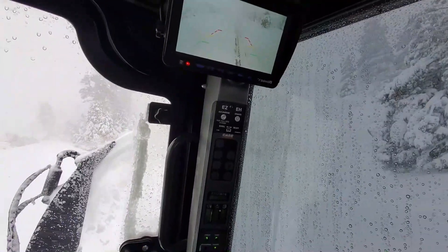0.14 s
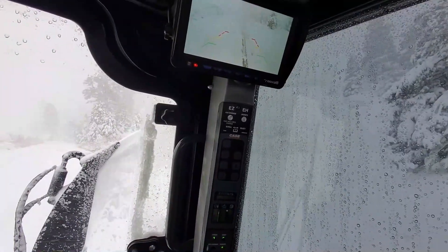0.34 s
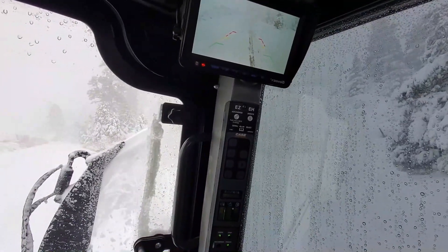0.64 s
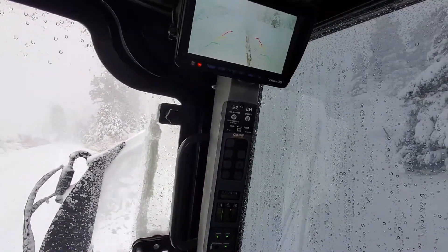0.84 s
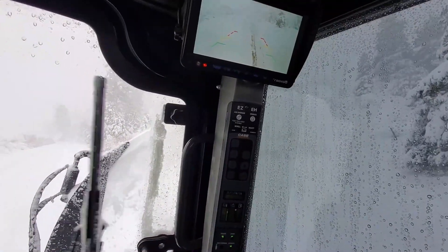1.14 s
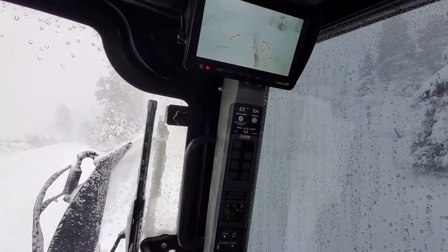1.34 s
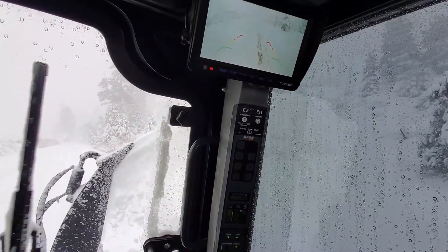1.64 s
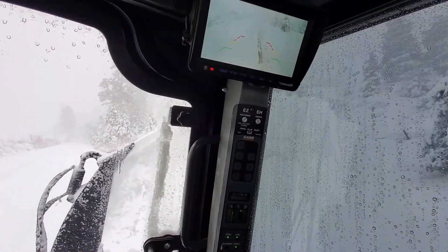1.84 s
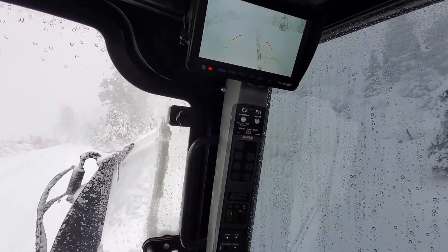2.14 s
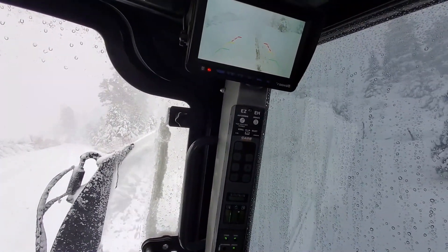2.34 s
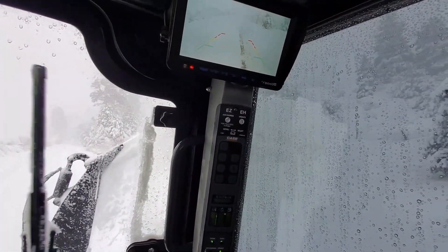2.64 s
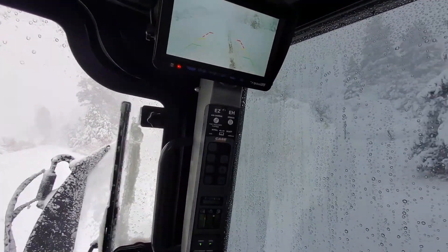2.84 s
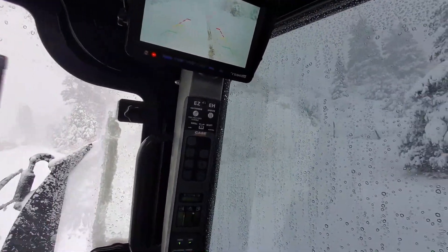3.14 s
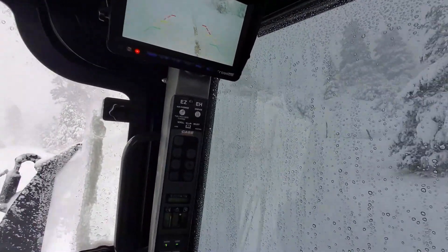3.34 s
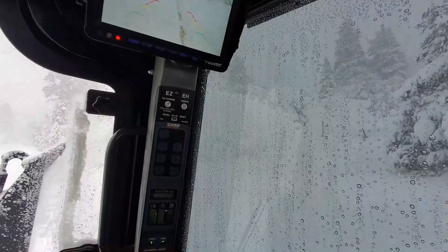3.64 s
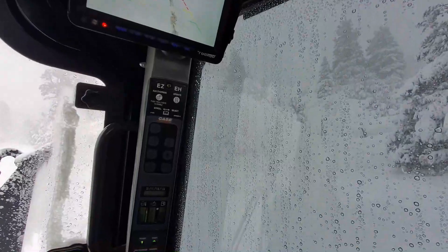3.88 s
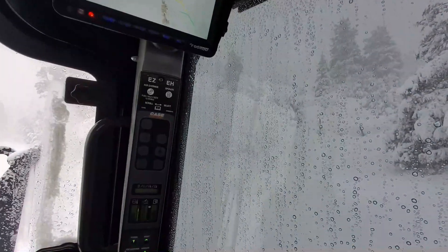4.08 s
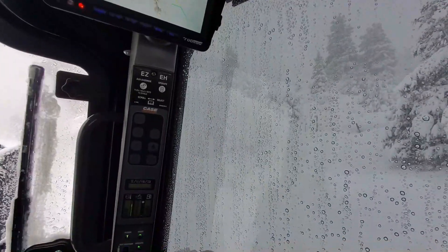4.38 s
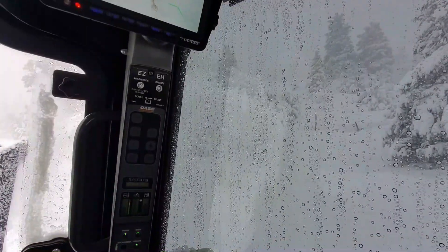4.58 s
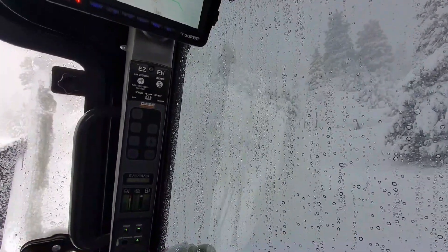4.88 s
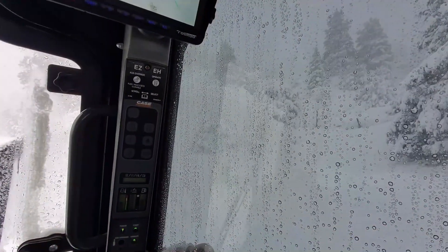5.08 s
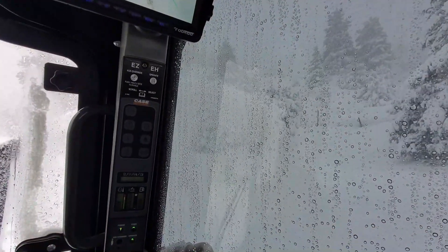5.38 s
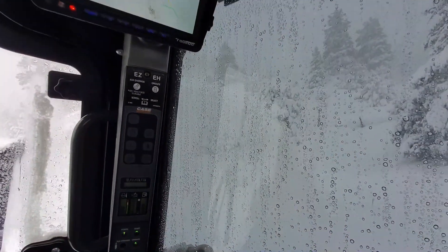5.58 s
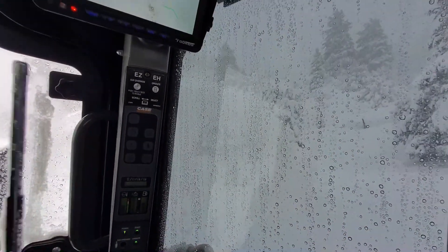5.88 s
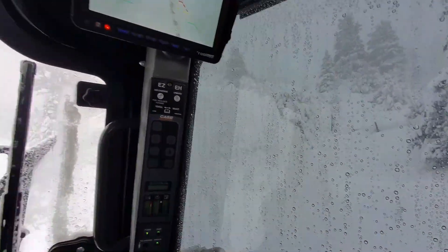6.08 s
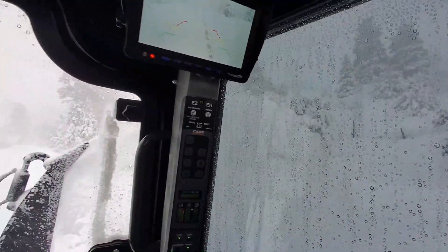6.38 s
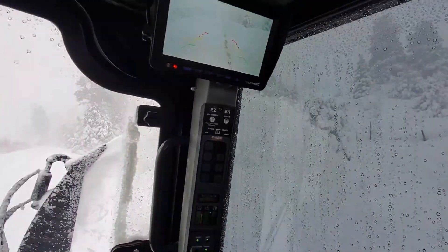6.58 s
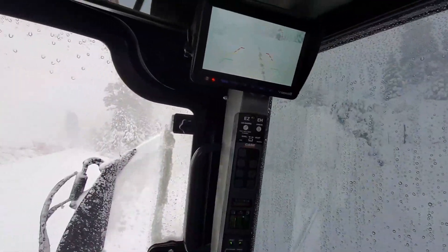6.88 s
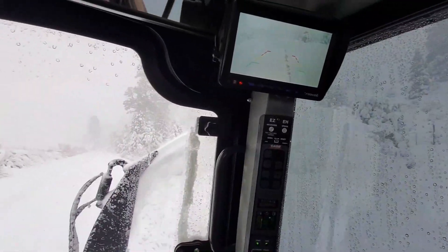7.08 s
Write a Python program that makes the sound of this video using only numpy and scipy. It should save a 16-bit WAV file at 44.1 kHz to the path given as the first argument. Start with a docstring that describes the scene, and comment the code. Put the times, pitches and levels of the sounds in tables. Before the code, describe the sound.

A continuous, dense mechanical drone fills a machine cab: low engine throb, firm hydraulic humming, fluttering high whine, snow rush and airy hiss. Revs sag very slightly at the start, then stay even, creeping up near the end. Individual tones drift in strength as the handheld microphone moves. A very brief dip in level occurs after five and a half seconds, followed by faint handling clicks. The left channel sounds muffled and bass-heavy, the right clearer.

```python
"""Loader cab with a snow blower at work

Inside the closed cab of a diesel loader, at steady high revs, every machine turns in step with the crankshaft.
The six-cylinder engine drones in shaft harmonics and knocks; a nine-piston pump whines by pressure ripple.
The blower's oil motor hums, its impeller thumps; low noise swells unevenly over a steady middle rush of snow.
A hand-held camera drifts through standing waves, so the tones swell and fade; its left microphone is muffled.
Air and oil hiss, the treble flickers, and the hand on the camera adds faint scuffs and ticks."""
import sys
import numpy as np
from scipy.fft import rfft, irfft, next_fast_len
from scipy.io import wavfile
from scipy.ndimage import map_coordinates

SR = 44100
rng = np.random.default_rng(int(sys.argv[2]) if len(sys.argv) > 2 else 0)


def to_wav(sig):
    """Store sig (one row per channel, or 1-D mono) as 16-bit WAV at the path in sys.argv[1].

    Samples outside -1..1 are clipped; the rate is SR.
    """
    pcm = np.clip(np.atleast_2d(sig), -1, 1) * 32767
    pcm = np.round(pcm).astype(np.int16)
    wavfile.write(sys.argv[1], SR, pcm.T)  # frames by channels


N = 318402  # samples
PISTONS = 9  # in the pump and in the blower's oil motor


def amp(db):
    """Decibel law: level in dB to amplitude gain."""
    return 10 ** (np.asarray(db) / 20)


def unit(x):
    """Power normalization: x at rms 1."""
    return x / np.sqrt(np.mean(x ** 2) + 1e-20)


def along(points, hz):
    """Logarithmic frequency scale: interpolate (frequency [Hz], value) points along it."""
    f, v = np.transpose(points)
    return np.interp(np.log(hz + 1), np.log(f + 1), v)


def curves(rows):
    """Linear interpolation in time: one value per sample for each column after the time."""
    s, *columns = np.transpose(rows)
    return [np.interp(np.arange(N) / SR, s, column) for column in columns]


def wobble(rate):
    """Band-limited random modulation: a smooth curve through normal knots, rate of them a second."""
    coarse = np.arange(0, N + 64, 64)
    knots = rng.standard_normal(2048)
    smooth = map_coordinates(knots, [coarse * rate / SR], mode="wrap")
    return np.interp(np.arange(N), coarse, smooth)


def filtered(x, response):
    """Linear filtering: the spectrum of x times a complex response of frequency."""
    size = next_fast_len(N + SR // 4, True)
    hz = np.fft.rfftfreq(size, 1 / SR)
    return irfft(rfft(x, size) * response(hz), size)[..., :N]


def coloured(white, spectrum):
    """Spectral density: white noise of rms 1 brought to a spectrum in dB per Hz."""
    return filtered(white, lambda hz: amp(along(spectrum, hz)) * np.sqrt(SR / 2))


# likeness of noise at the two ears: (frequency [Hz], correlation [-1..1])
EAR_LIKENESS = [(30, .93), (100, .88), (150, .55), (240, .44), (310, .82), (400, .85), (500, .23),
                (700, .17), (1200, .1), (2500, .05)]


def rush(spectrum):
    """Interaural coherence: stereo noise, most alike in the deep bass and nearly unrelated in the treble."""
    def mid_side_gain(hz):
        angle = np.arccos(np.clip(along(EAR_LIKENESS, hz), -1, 1)) / 2
        return amp(along(spectrum, hz)) * np.sqrt(SR / 2) * [np.cos(angle), np.sin(angle)]

    mid, side = filtered(rng.standard_normal((2, N)), mid_side_gain)
    return np.array([mid + side, mid - side])


# the camera's path in the cab: (time [s], sideways [-1..1], forward [-1..1], height [-1..1])
CAMERA_PATH = [(0.2, 0.21, 0.89, -0.22), (0.55, -0.38, 0.97, 0.12), (1.1, -0.11, 0.84, 0.16),
               (1.6, -0.43, 0.01, 0.42), (2.0, -0.32, -0.69, 0.068), (2.5, -0.55, -0.58, 0.71),
               (2.75, -0.14, -0.29, -0.74), (3.2, 0.33, 0.082, -0.11), (3.7, 0.53, 0.33, -0.15),
               (4.2, 0.9, 0.17, 0.049), (5.0, 0.97, -0.09, 0.4), (5.6, 0.77, -0.017, -0.1),
               (6.15, 0.46, -0.54, -0.61), (6.6, -0.074, -0.15, -0.86), (7.1, -0.39, 0.6, -0.68)]


def tones(multiples, table, turns, flutter_db, flutter_rate, scatter_db):
    """Standing waves: each shaft multiple changes level with the camera's place, over a restless panel share."""
    place, out = np.array(curves(CAMERA_PATH)), np.zeros((2, N))
    for multiple, (db, left_db, *slopes) in zip(multiples, table):
        level = np.sqrt(2) * amp(db + np.dot(slopes, place) + flutter_db * wobble(flutter_rate))
        # the panels' share ignores the camera's place, so it flickers most where the tone has faded
        scatter = amp(db + scatter_db) * (wobble(flutter_rate) + 1j * wobble(flutter_rate))
        partial = (level + scatter) * np.exp(2j * np.pi * (multiple * turns + rng.random()))
        # short waves differ more in phase between the ears
        apart = min(multiple / 30, 1) * np.dot(rng.standard_normal(3), place)
        left = amp(left_db) * (partial * np.exp(1j * apart)).real
        out += [left, partial.real]
    return out


def tone(cycles, db, flutter_db, flutter_rate):
    """Amplitude modulation: one sine at an rms level, with a slight random flutter."""
    size = np.sqrt(2) * amp(db + flutter_db * wobble(flutter_rate))
    return size * np.sin(2 * np.pi * (cycles + rng.random()))


def bursts(rows, spectrum, attack_s):
    """Exponential decay: puffs of coloured noise that fall 30 dB in their decay time."""
    t, envelope = np.arange(N) / SR, np.zeros(N)
    for s, db, decay_s in rows:
        age = np.maximum(t - s, 0)
        envelope += amp(db - 30 * age / decay_s) * (1 - np.exp(-age / attack_s))
    return envelope * unit(coloured(rng.standard_normal(N), spectrum))


# colour of the flickering treble: (frequency [Hz], relative density [dB per Hz])
TREBLE_COLOUR = [(3000, -25), (5500, -0.5), (9000, 4), (12000, 0.5), (13500, -7), (15500, -16)]


def treble_flicker():
    """Random intensity modulation: the top of the hiss flickers unevenly."""
    swell_db = 1.2 * wobble(5) + 3.6 * wobble(40)
    noise = coloured(rng.standard_normal(N), TREBLE_COLOUR)
    return amp(-60.5) * unit(amp(swell_db) * noise)


# colour of the hiss: (frequency [Hz], relative density [dB per Hz])
AIR_COLOUR = [(2000, -20), (3500, 10), (4100, 9), (4600, 14), (5400, 10), (6100, 4.5), (7600, -2.5),
              (8800, -0.5), (10000, -4.5), (11900, -2), (13000, -13), (15000, -26)]


def air(turns):
    """Turbulent flow noise: a fine, restless hiss of air and oil, pulsing weakly with the pump's pistons."""
    strokes = np.sin(2 * np.pi * PISTONS * turns)
    flicker_db = .95 * wobble(22)
    return amp(-48.0 + flicker_db) * (1 + .07 * strokes) * unit(rush(AIR_COLOUR))


# ticks of the camera's case: (time [s], onset level [dB], decay by 30 dB [s])
CASE_TICKS = [(5.732, -42, .007), (5.995, -52, .005), (6.291, -47, .007), (6.851, -45, .025)]
# their colour: (frequency [Hz], relative density [dB per Hz])
TICK_COLOUR = [(3000, -30), (10000, -10), (12000, 0), (13800, -2), (15500, -12)]


def ticks():
    """Impulsive excitation: tiny, very bright ticks of the camera's case in the hand."""
    return bursts(CASE_TICKS, TICK_COLOUR, attack_s=.0004)


# scuffs of the hand on the camera: (time [s], onset level [dB], decay by 30 dB [s])
HAND_SCUFFS = [(1.784, -42, .04), (5.711, -44, .04), (7.028, -41, .04)]
# their colour: (frequency [Hz], relative density [dB per Hz])
SCUFF_COLOUR = [(1500, -30), (4500, 7), (9000, 6), (11500, -2), (14500, -10), (15500, -18)]


def scuffs():
    """Friction noise: short brushes of skin on the camera's case."""
    return bursts(HAND_SCUFFS, SCUFF_COLOUR, attack_s=0.0037)


# level of the timing gears at the right: (time [s], level [dB])
TIMING_GEAR_LEVEL = [(0.0, -46), (1.15, -46), (1.95, -64), (2.85, -48.0), (4.0, -46), (4.4, -53),
                     (4.65, -46), (6.15, -48), (6.7, -43), (7.21, -61)]
# fainter gear tones: (multiple of the crankshaft's rate)
GEAR_MULTIPLES = [5.75, 36.38, 61.92]
# one row per gear tone: (level [dB], extra on the left [dB],
# slopes sideways, forward, height [dB per unit of the camera's path])
GEAR_TONES = [(-65, 14.5, 4.5, -1.0, 0), (-60.5, -23, -1.0, 1.5, 4), (-56.5, -3, 1, 1.5, -3)]


def gears(turns):
    """Tooth-mesh frequency: 60 timing teeth a turn sing, with fainter gear tones at fractional multiples."""
    mesh = tone(60 * turns, curves(TIMING_GEAR_LEVEL)[0], flutter_db=1.5, flutter_rate=18)
    others = tones(GEAR_MULTIPLES, GEAR_TONES, turns, flutter_db=0, flutter_rate=9.1, scatter_db=-28)
    return amp([[-7], [0]]) * mesh + others  # the mesh is weaker on the left


# the two deepest engine tones: (multiple of the crankshaft's rate)
THROB_MULTIPLES = [2, 2.5]
# their levels at the left: (time [s], first tone [dB], second tone [dB])
THROB_SWELL = [(0.0, -46, -47), (0.45, -38.5, -49), (0.6, -50, -32), (0.7, -57, -52), (1.0, -41.0, -50),
               (1.3, -52, -43.5), (1.5, -53.0, -41.5), (1.65, -44.5, -42.5), (2.0, -57, -51),
               (2.4, -39, -39), (2.5, -51, -43), (2.95, -44, -39.5), (3.35, -42.5, -54), (3.65, -53, -44.5),
               (4.2, -41.5, -48), (4.5, -43, -50), (4.75, -41, -48), (4.9, -58, -41.5), (5.2, -45, -42),
               (5.85, -47, -41), (6.15, -44, -45.5), (6.8, -46, -42.0), (6.85, -51, -61), (7.21, -43, -40)]
# their right ear against the left: (gain [dB])
THROB_RIGHT_GAIN = [-11, 2.5]


def throb(turns):
    """Low shaft harmonics: the two deepest engine tones swell and sink in the cab."""
    out = np.zeros((2, N))
    for multiple, db, right_db in zip(THROB_MULTIPLES, curves(THROB_SWELL), THROB_RIGHT_GAIN):
        deep = tone(multiple * turns, db, flutter_db=1.0, flutter_rate=5.1)
        out += amp([[0], [right_db]]) * deep
    return out


# level of the firing hum before the gain at each ear: (time [s], level [dB])
FIRING_HUM_LEVEL = [(0.0, -37), (0.3, -45), (0.34, -48), (0.9, -46), (0.96, -57), (1.04, -45.5),
                    (2.69, -48.5), (3.6, -43), (3.8, -46), (3.94, -40.5), (7.13, -42.5), (7.15, -41)]


def firing_hum(turns):
    """Firing harmonic: a clean, slightly wavering hum at four times the engine's three firings a turn."""
    size = np.sqrt(2) * amp(curves(FIRING_HUM_LEVEL)[0] + 0.64 * wobble(5.9))
    phase = 2 * np.pi * 12 * turns + 0.065 * wobble(5.5)
    return amp([[10], [4]]) * size * np.sin(phase)  # left and right gain in dB


# overtones of the engine: (multiple of the crankshaft's rate)
DIESEL_MULTIPLES = [4, 4.5, 5, 6, 7.5, 8, 9.5, 11, 13, 16, 28, 28.5, 84]
# one row per overtone: (level [dB], extra on the left [dB],
# slopes sideways, forward, height [dB per unit of the camera's path])
DIESEL_TONES = [(-59, -2, -3, 8.5, 6), (-51, -3.5, -2, 3, -2), (-61.5, 0, 7, -5, 0), (-56, -3, -7, 11, -5),
                (-44, -4.5, 0.5, -0.5, 0.5), (-40, -2.5, -2, 5.5, -1), (-56, 2, -9, 8, -4),
                (-43, -1.5, 0.5, 0, -1.5), (-65.5, 16, -1, 6.5, 5), (-49, -6, 0.5, 5.5, 11),
                (-54, -15, -4, 6, 4), (-54.5, -14, -7, -3, 0), (-64, 2, 14.5, 4, -2)]
# colour of the knock before its final gain: (frequency [Hz], density [dB per Hz])
KNOCK_COLOUR = [(90, -88), (170, -76), (330, -69), (520, -73), (900, -74.5), (1200, -77), (1700, -84),
                (2800, -85), (3600, -97), (5500, -112), (9000, -120)]
# mean noise of the cab panels: (frequency [Hz], density [dB per Hz])
PANEL_BOOM = [(35, -63.5), (60, -59), (80, -59), (104, -57), (125, -62), (150, -64), (200, -66),
              (250, -67.5), (290, -55), (375, -56), (430, -61), (520, -63.5), (700, -74), (1500, -120)]


def diesel(turns):
    """Periodicity of the four-stroke cycle: overtones and a knock repeating every two turns, with panel boom."""
    size = round(2 * N / turns[-1])  # samples in two turns
    random_phases = np.exp(2j * np.pi * rng.random(size // 2 + 1))
    cycle = unit(irfft(random_phases, size))
    repeated = map_coordinates(cycle, [turns / 2 % 1 * size], mode="grid-wrap")
    knock = coloured(repeated, KNOCK_COLOUR) * amp(-1.5 + 0.97 * wobble(6.5))
    boom = rush(PANEL_BOOM) * amp(0.14 * wobble(3.3))
    drone = tones(DIESEL_MULTIPLES, DIESEL_TONES, turns, flutter_db=1.5, flutter_rate=8.2, scatter_db=-16.0)
    return drone + knock + boom


# three strong pump whines: (multiple of the crankshaft's rate)
WHINE_MULTIPLES = [45, 54, 63]
# their levels at the right: (time [s], first [dB], second [dB], third [dB])
WHINE_LEVEL = [(0, -41.5, -48, -38), (.07, -42, -47, -43), (.15, -41, -47, -35.5), (.21, -39.5, -46.5, -41),
               (.26, -39, -46, -35), (.34, -39.5, -46, -42), (.6, -40.5, -45, -48.5),
               (.8, -40.5, -45, -45.5), (1.3, -41, -46, -44.5), (1.65, -43.5, -45.5, -50),
               (2.15, -44.5, -46, -53), (2.58, -43, -45, -59), (2.68, -43.5, -46.5, -46),
               (2.82, -43.5, -46, -41), (3.05, -43, -45, -45), (3.25, -42.5, -48, -38.5),
               (3.45, -43.5, -44, -38), (3.65, -46, -45, -35.5), (3.85, -47.5, -42, -34.5),
               (4.3, -53, -40.3, -35.5), (4.75, -55, -45, -36.5), (5.25, -56, -41.5, -36.5),
               (5.5, -57.5, -44.5, -37.5), (5.85, -54, -46.5, -38.5), (5.95, -57.5, -42.5, -40),
               (6.15, -57.5, -42, -39.5), (6.45, -46, -43, -43), (6.65, -45.5, -42, -39),
               (7.0, -40.5, -49.5, -42), (7.2, -42.5, -60, -44.5)]


def whines(turns):
    """Sidebands: three strong pump tones flutter and buzz once and twice a turn."""
    buzz = 1 + .05 * np.sin(2 * np.pi * turns) + .06 * np.sin(4 * np.pi * turns)
    whine = np.zeros(N)
    for multiple, db in zip(WHINE_MULTIPLES, curves(WHINE_LEVEL)):
        whine += tone(multiple * turns, db, flutter_db=.85, flutter_rate=34)
    return amp([[-4], [0]]) * buzz * whine  # weaker on the left


# level of the pump's piston hum: (time [s], left level [dB], right level [dB])
PISTON_HUM_LEVEL = [(0.0, -33, -29.5), (0.4, -35.5, -32.5), (0.75, -33, -30.0), (1.75, -35, -31.5),
                    (2.0, -41, -39), (2.25, -36.5, -32.5), (2.9, -33.5, -33.5), (3.65, -36, -32.5),
                    (4.25, -33.5, -35.5), (5.35, -36, -37.5), (5.55, -29.5, -44), (5.75, -32.5, -33.5),
                    (6.2, -38.5, -41), (6.7, -32.5, -34), (6.9, -36.5, -35), (7.21, -35, -28.0)]
# the pump's other tones: (multiple of the crankshaft's rate)
PUMP_MULTIPLES = [18, 27, 36, 72, 81, 90, 99, 108, 117, 126, 135, 153, 162, 171, 180, 216, 252]
# one row per tone: (level [dB], extra on the left [dB],
# slopes sideways, forward, height [dB per unit of the camera's path])
PUMP_TONES = [(-46.5, 0.5, 8, -1.5, 0.5), (-51.5, -5.5, 0, -1.5, -4), (-54.5, -1, 4, -1.5, 2),
              (-60.5, 4, 18.5, 4, -5), (-54.5, -7, 0, 1, 3.5), (-64.5, 19.5, 16.5, -4, -5),
              (-60, 3, 5.5, 0.5, 1), (-60, -5, 4.5, 7, 6.5), (-63.5, 0, -5, 8, 5), (-62, 0, -2, -3, -2),
              (-61, 0, 4, 3, -5), (-74, 0, 6, 7, 3), (-73, 0, 2, -4.5, 3.5), (-74.5, 0, 9, 6, 0),
              (-74, 0, 1, 5, -3), (-79, 0, -6, 7, 1), (-79, 0, 10, 9, -2)]


def pump(turns):
    """Pressure ripple: nine pistons a turn pulse the hoses, and all their tones flutter with the oil pressure."""
    pressure_db = .25 * wobble(22)
    hum = tone(PISTONS * turns, np.array(curves(PISTON_HUM_LEVEL)), flutter_db=1.3, flutter_rate=20)
    ripple = tones(PUMP_MULTIPLES, PUMP_TONES, turns, flutter_db=1.43, flutter_rate=14, scatter_db=-19)
    return amp(pressure_db) * (hum + ripple + whines(turns))


# level of the oil motor's piston hum: (time [s], left level [dB], right level [dB])
MOTOR_HUM_LEVEL = [(0.0, -33, -31), (0.55, -29, -30.0), (1.05, -33, -32.5), (1.9, -32, -32.5),
                   (2.6, -34.5, -35.5), (3.2, -32, -36), (3.35, -30.5, -36.0), (3.7, -34.0, -38),
                   (4.45, -36, -40), (5.1, -34.5, -47), (5.55, -35, -46.0), (6.05, -35, -43),
                   (6.25, -35.5, -42), (6.45, -31, -33.5), (6.7, -30.5, -38), (7.21, -31, -30.5)]
# the oil motor's low tones: (multiple of the motor's rate)
MOTOR_MULTIPLES = [4, 5]
# one row per low tone: (level [dB], extra on the left [dB],
# slopes sideways, forward, height [dB per unit of the camera's path])
MOTOR_TONES = [(-54, 2.1, 0.5, -3.5, 2), (-57, 7.6, 0, 6.5, -10.5)]
# level of the impeller's thump: (time [s], level [dB])
THUMP_LEVEL = [(0.0, -34), (0.7, -35), (0.85, -38), (1.15, -34.5), (1.5, -30.5), (1.6, -41), (1.8, -33),
               (2.25, -35), (2.3, -49), (2.5, -36), (4.15, -36.0), (4.25, -37), (4.4, -36.5), (5.05, -34.5),
               (5.2, -32.0), (5.45, -40), (5.7, -34.0), (5.9, -46), (6.05, -36), (6.2, -42), (6.3, -35),
               (6.65, -43), (6.75, -34.5), (7.21, -35)]
# uneven strength of the low rumble: (time [s], relative level [dB])
RUMBLE_STRENGTH = [(0.0, -26), (0.7, -17), (1.0, -23), (1.5, -19), (1.6, -23.5), (1.8, -15), (2.0, -22),
                   (2.4, -22), (2.5, -19), (4.3, -27.5), (4.4, -19), (4.5, -20), (5.3, -19), (5.4, -23),
                   (5.8, -15), (5.9, -26), (6.1, -18), (6.2, -24), (6.5, -13), (6.6, -24), (7.0, -15),
                   (7.2, -26)]
# nearly steady strength of the rush in the chute: (time [s], relative level [dB])
CHUTE_RUSH = [(0.0, -46), (0.48, -46), (2.53, -48.5), (2.95, -46.5), (4.36, -47), (4.52, -46.5),
              (5.26, -47), (5.38, -46.5), (5.44, -48), (6.51, -47.5), (6.63, -48.5), (7.15, -47)]
# colour of the cab's shaking: (frequency [Hz], relative density [dB per Hz])
SHAKE_COLOUR = [(10, -34), (28.5, -24), (30.5, 1.5), (32, 4.5), (40, 4.5), (46, -2), (54, -8.5), (75, -23),
                (120, -72)]
# colour of the snow in the chute: (frequency [Hz], relative density [dB per Hz])
SNOW_COLOUR = [(250, -43), (480, -3.5), (580, -1), (640, 7.5), (675, 2.5), (750, -1.5), (1000, -3),
               (1400, -8.5), (1750, -8.5), (2100, -5.5), (2550, -4.5), (2900, -6), (3280, -5),
               (3700, -16.5), (5000, -64)]


def blower(turns):
    """Blade-passing frequency: the impeller thumps, the oil motor hums, the cab shakes and snow rushes."""
    slip = 0.007 * wobble(2.99)  # the oil drive slips a little
    motor_turns = 1.1013 * turns + slip
    blade_passes = 1.125 * turns + slip
    hum = tone(PISTONS * motor_turns, np.array(curves(MOTOR_HUM_LEVEL)), flutter_db=1.3, flutter_rate=20)
    drone = tones(MOTOR_MULTIPLES, MOTOR_TONES, motor_turns, flutter_db=1.75, flutter_rate=10, scatter_db=-17)
    thump = tone(blade_passes, curves(THUMP_LEVEL)[0], flutter_db=.5, flutter_rate=8)
    shake = amp(curves(RUMBLE_STRENGTH)[0] - 18.5) * unit(rush(SHAKE_COLOUR))
    snow_db = curves(CHUTE_RUSH)[0] + 11 + 0.92 * wobble(13)
    snow = amp(snow_db) * unit(rush(SNOW_COLOUR))
    return hum + drone + thump + shake + snow


# the engine bogs as the blower bites, lugs, then recovers: (time [s], crankshaft rate [turns per s])
CRANK_RATE = [(0.0, 41.28), (0.4, 40.76), (0.5, 40.7), (0.9, 40.82), (1.7, 40.69), (2.2, 40.68),
              (2.8, 40.57), (3.6, 40.66), (3.8, 40.58), (4.1, 40.67), (4.3, 40.6), (4.6, 40.69),
              (5.3, 40.69), (6.0, 40.81), (6.1, 40.91), (7.2, 41.09)]


def scene():
    """Phase as the integral of speed: all machines are geared to one crankshaft that trembles slightly."""
    turns = np.cumsum(curves(CRANK_RATE)[0]) / SR + 0.00067 * wobble(12)
    handling = ticks() + scuffs()
    engine = gears(turns) + throb(turns) + firing_hum(turns) + diesel(turns)
    return treble_flicker() + air(turns) + handling + engine + pump(turns) + blower(turns)


def dip():
    """Gain envelope: the level dips briefly, once, falling faster than it returns."""
    start_s, depth, recovery_s = 5.557, .82, .009
    age = np.arange(N) / SR - start_s
    width = np.where(age < 0, recovery_s / 10, recovery_s)
    return 1 - depth * np.exp(-(age / width) ** 2)


# response of the muffled left microphone: (frequency [Hz], gain [dB])
LEFT_RESPONSE = [(60, 14.5), (130, 15.5), (170, 12.5), (220, 7.5), (310, 2), (420, 2), (600, -5.5),
                 (1100, -8.5), (1800, -13.5), (2500, -19.5), (3200, -44), (4200, -47), (5000, -62)]
# phase by which the left microphone trails: (frequency [Hz], lag [rad])
LEFT_PHASE_LAG = [(20, .08), (100, 0.39), (200, 0.57), (370, 1.08), (490, 1.86), (750, 1.46), (1200, 1.17),
                  (2500, 1.1)]


def record(dry):
    """Microphone transfer function: the left is boomy, dull and late; both stop at a band limit."""
    left, right = dry * dip()
    left = filtered(left, lambda hz: amp(along(LEFT_RESPONSE, hz)) * np.exp(-1j * along(LEFT_PHASE_LAG, hz)))
    return filtered(np.array([left, right]), lambda hz: hz < 15500)


dry = scene()
out = record(dry)
to_wav(out)
```